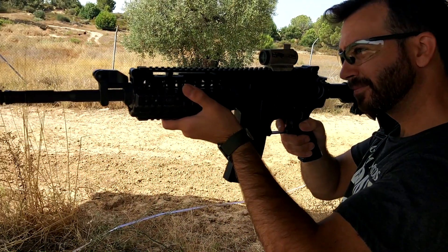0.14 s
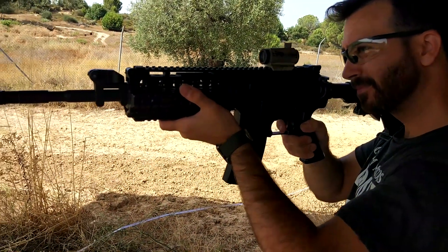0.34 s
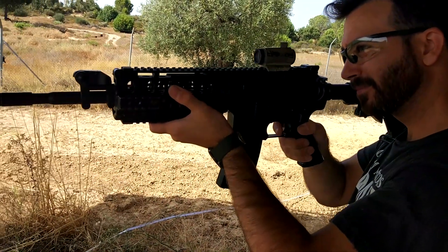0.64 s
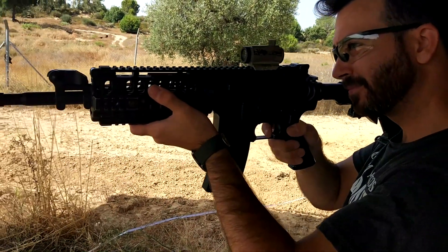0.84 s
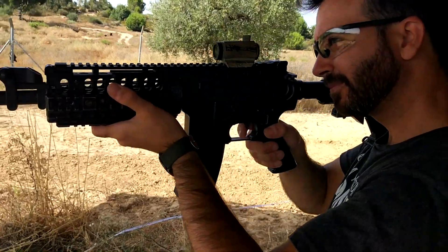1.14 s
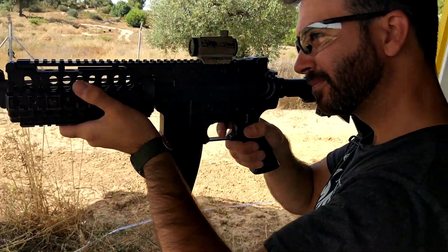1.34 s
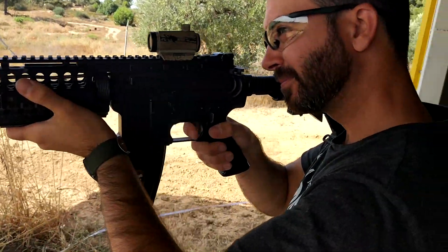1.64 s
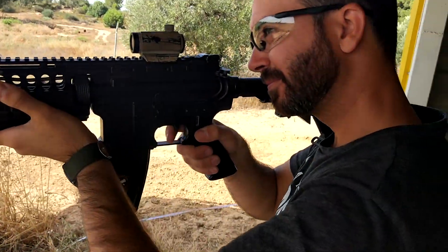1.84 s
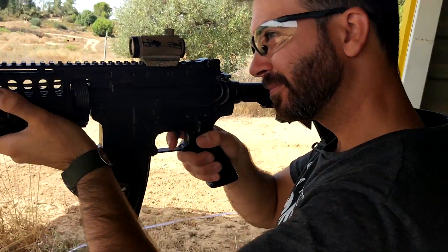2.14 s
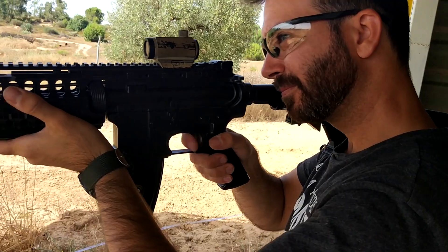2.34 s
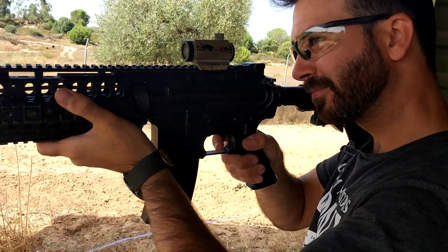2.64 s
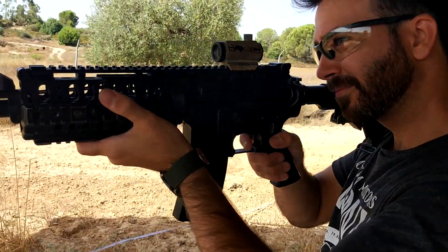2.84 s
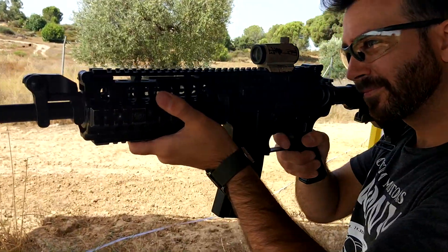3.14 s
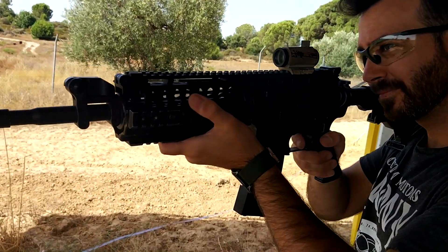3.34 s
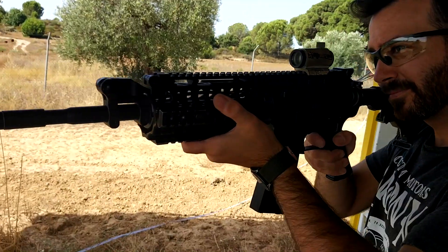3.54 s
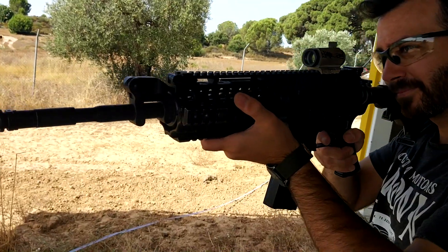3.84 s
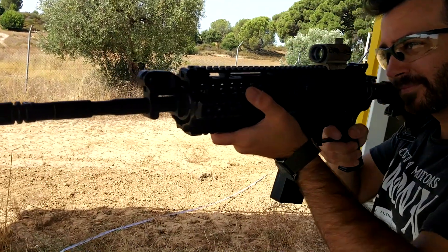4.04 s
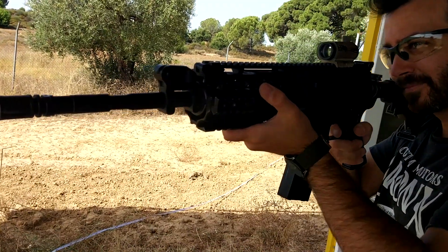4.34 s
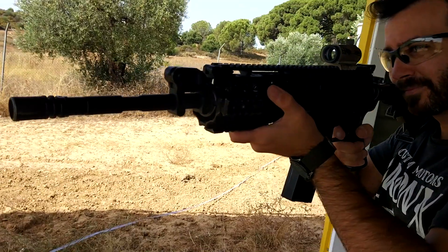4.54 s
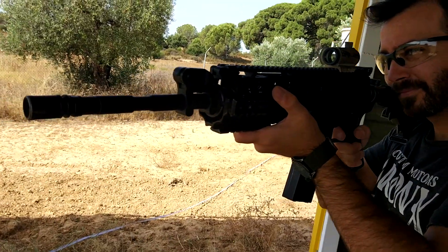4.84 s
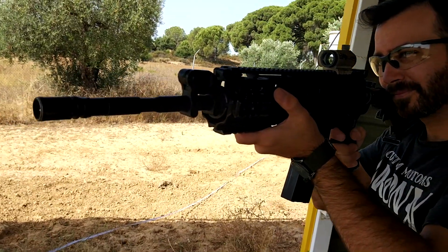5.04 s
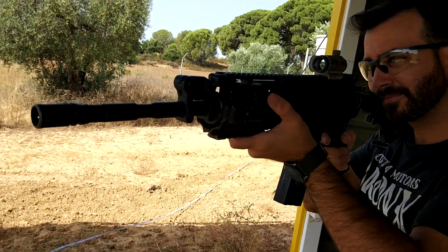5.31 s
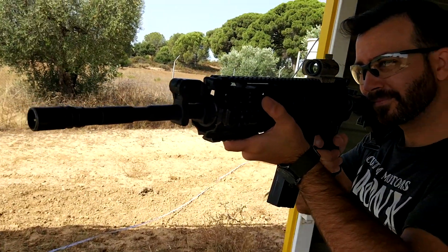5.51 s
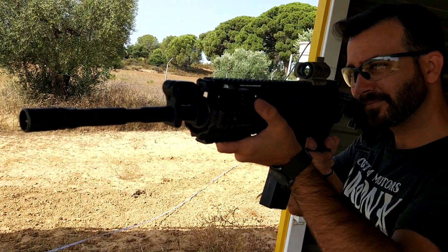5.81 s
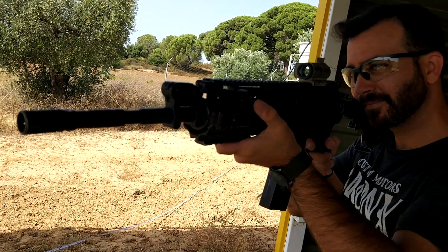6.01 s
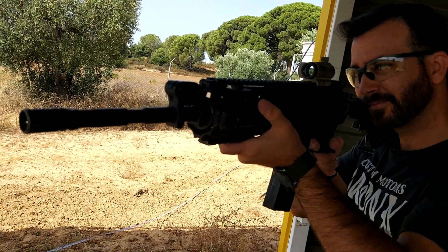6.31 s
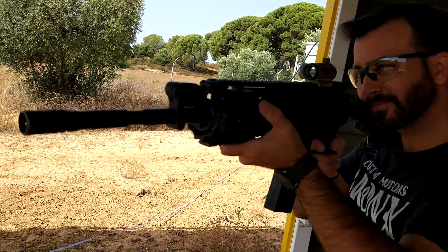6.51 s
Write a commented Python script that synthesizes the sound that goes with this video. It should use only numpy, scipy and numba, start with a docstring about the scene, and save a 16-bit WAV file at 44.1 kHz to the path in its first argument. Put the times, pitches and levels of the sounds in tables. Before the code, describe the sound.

Close, dry mechanical snaps from a motorised airsoft gun, each led by a brief whirr, with small clicks and handling bumps under an open shelter.

```python
"""An electric airsoft rifle fires single shots from a shelter at a dry outdoor range, close to a phone.
One shot has just gone off, and its echo is dying away at the start; ten more follow. For each, a motor drives
gears that whine and rasp against a spring, then a piston slams home in a burst of noise with a bright crack,
and the shelter rings on. Between the slams steel parts click, fingers bump, tick and once knock on the phone.
The phone turns towards the muzzle and the grip's rumble dies down; a faint open-air hush runs throughout."""
import sys
import numpy as np
from scipy import signal
from scipy.fft import rfft, irfft, next_fast_len
from scipy.io import wavfile
from numba import njit

SR = 44100
rng = np.random.default_rng(int(sys.argv[2]) if len(sys.argv) > 2 else 0)


def transcribe(u):
    """Save the signal u as a 16-bit wav file named by the first command-line argument.

    u: samples, shape (n,) or (channels, n), limited to [-1, 1]; the rate is SR.
    q: integer samples, one column per channel.
    """
    v = np.clip(np.atleast_2d(u).T, -1, 1)
    q = np.round(v * 32767).astype(np.int16)
    wavfile.write(sys.argv[1], SR, q)


N = 294147
TIME = np.arange(N) / SR
SIZE = next_fast_len(N + SR)  # room for a sound's tail when filtering
FREQ = np.maximum(np.arange(SIZE // 2 + 1) * SR / SIZE, 1)

# The shots; the first falls before the start. Each row: motor start in seconds, slam in seconds,
# whine level in dB, gear rasp level in dB, slam level in dB, time the gears take to bite in seconds.
SHOTS = [(-.2, -0.078, 3, 0, 1.5, 0.018), (0.237, 0.355, -6.5, 1.5, 0, 0.018),
         (.947, 1.071, 3.5, -4.5, 2, 0.021), (1.644, 1.774, 5.5, -1, 1, 0.025),
         (2.35, 2.48, 4.5, 0, 0.5, 0.023), (3.053, 3.174, 2, -0.5, 2.5, 0.013),
         (3.507, 3.637, 3.5, -2.5, 1.5, 0.027), (3.961, 4.083, -15, 2, -0.5, 0.028),
         (4.953, 5.075, 2, -3, 1, .027), (5.682, 5.811, 1, -3, 0, 0.025), (6.438, 6.566, 2.5, -1, -2, .026)]
# Resonances of the gearbox and receiver. Each row: frequency in Hz, width in Hz,
# lift at the left microphone in dB, lift at the right in dB.
BODY_MODES = [(371, 54, 8.5, 1), (486.5, 19, 6, 9.5), (632, 55, 10.5, 7.5), (886, 180, 10.5, 10.5),
              (973, 21, 7.5, -5), (1353, 233, 12.5, 5), (1803, 163, 1, 11), (1968, 130, -5.5, 1),
              (2380, 350, -4.5, 8), (2770, 150, 7, 6), (3010, 170, -1, 9.5), (3518, 68, 1, 13),
              (3720, 150, 8.5, -0.5), (3930, 51, 1.5, -1), (4170, 90, 7, 0), (4610, 40, 0.5, -9),
              (4725, 41, 0.5, 10.5), (5240, 29, 11.5, 5.5), (5700, 49, -3, 10), (5900, 80, 7.5, 2.5),
              (6250, 72, 12, -3), (6500, 50, 13, -3.5), (7300, 77, 3, 4.5)]
# Trigger and latch clicks. Each row: time in seconds, relative level in dB.
CLICKS = [(3.965, -10.5), (4.705, 0.5), (4.959, -14.5), (5.673, 3), (6.44, -17)]
# The clearest tiny dry ticks. Each row: time in seconds, relative level in dB.
TICKS = [(1.3368, -26), (1.3722, -22), (1.4007, -15.5), (1.9947, -19), (2.1822, -18), (4.415, -15.5),
         (4.4854, -25), (4.8553, -25.5), (6.246, -24.5)]
# Restlessness of the grip, which settles as the phone comes to rest. Each row: time in seconds, rumble in dB.
GRIP = [(0, -45.5), (1.4, -45.5), (2.9, -51.5), (4.3, -54), (5.5, -61), (6.2, -73.5)]
# The phone moves from beside the rifle towards its front.
# Each row: time in seconds, position from 0 (side-on) to 1 (near the muzzle).
FACING = [(1, 0.026), (2.4, 0.16), (3.6, 0.78), (6.5, 1)]


def undb(db):
    """Turn decibels into a gain."""
    return 10 ** (np.asarray(db) / 20)


def unit(x):
    """Scale to an rms of 1."""
    return x / np.sqrt(np.mean(np.abs(x) ** 2))


def pan(db):
    """Left and right gains for a level difference, left minus right, in dB."""
    gains = undb(np.array([[1], [-1]]) * db / 2)
    return gains / np.sqrt(np.mean(gains ** 2, axis=0))


def slope(points):
    """Join (Hz, dB) points by straight lines on a log-frequency axis."""
    hz, db = np.transpose(points)
    return np.interp(np.log(FREQ), np.log(hz), db)


def response(points, modes=()):
    """A broad slope plus resonances, in each microphone's own measure, as a filter that never rings early."""
    db = slope(points)
    for hz, width, left_db, right_db in modes:
        peak = 1 / (1 + (2 * (FREQ - hz) / width) ** 2)
        db = db + np.array([[left_db], [right_db]]) * peak
    # folding the cepstrum forward in time gives the phase of a sound that starts at once
    cepstrum = irfft(np.log(undb(db)), SIZE)
    cepstrum[..., 1:SIZE // 2] *= 2
    cepstrum[..., SIZE // 2 + 1:] = 0
    return unit(np.exp(rfft(cepstrum)))


def through(x, gain):
    """Pass a sound through a frequency response."""
    return irfft(rfft(x, SIZE) * gain, SIZE)[..., :N]


def air(split_hz):
    """Noise at two microphones: much alike below split_hz, unrelated well above."""
    likeness = .88 / (1 + (FREQ / split_hz) ** 4)
    shares = np.sqrt([(1 + likeness) / 2, (1 - likeness) / 2])
    mid, side = through(rng.standard_normal((2, N)), shares)
    return np.array([mid + side, mid - side])


def walk(rate):
    """Random drift with a spread near 1, heading for a new value `rate` times a second."""
    steps = rng.standard_normal(N // 20)
    return np.interp(TIME * rate, np.arange(len(steps)), steps)


def along(curve, s):
    """Value of a control curve at time s."""
    return np.interp(s, *np.transpose(curve))


def add(track, s, sound):
    """Mix a sound into a track from time s on."""
    start = int(round(s * SR))
    first, last = max(start, 0), min(start + sound.shape[-1], track.shape[-1])
    if last > first:
        track[..., first:last] += sound[..., first - start:last - start]


def shake(t):
    """Quick random unevenness of gear teeth, new every few milliseconds."""
    knots = t[::100]
    return np.interp(t, knots, rng.standard_normal(len(knots)))


def shifting(x):
    """As the gears turn, their force wanders between three families of gearbox frequencies."""
    out = 0
    for k in range(3):
        family = (1 + np.cos(2 * np.pi * (FREQ / 950 + k / 3))) / 3
        out = out + through(x, family) * undb(3.5 * walk(45) - 1)
    return out


def gears(spin_up_s=.032, load=.1, whine_db=-22, rasp_db=-18.0, squeal_db=-26):
    """The motor runs up and sags as the spring tightens; meshing teeth whine and rasp through the gearbox."""
    # Tones of the gear mesh. Each row: multiple of the mesh rate, level in dB.
    mesh_tones = [(1, -1.5), (1.44, -10), (2, -8.5)]
    # Broad colour of the rasp. Each row: frequency in Hz, level in dB.
    rasp_colour = [(100, -39.5), (350, -16.5), (560, -14), (720, -8), (1000, -3), (2000, 2), (3100, -5),
                   (4500, 6.5), (6500, 0.5), (8000, -5.5), (9500, -9), (15500, -15.5)]
    # Balance of the gears. Each row: frequency in Hz, left minus right in dB.
    gear_balance = [(200, -4.5), (700, -2.5), (1300, -8.5), (2300, -4), (4400, -2.5), (9000, -1)]
    stroke_teeth = 162  # sets the mesh rate before run-up and sag: a quicker shot whines higher
    squeal_front_db = -16  # the pinion is weaker from the front
    t = np.arange(SR // 4) / SR
    whine, growl, scrape = np.zeros((2, N)), np.zeros(N), np.zeros(N)
    for start, slam_s, tone_db, teeth_db, _, bite_s in SHOTS:
        run = slam_s - start
        mesh_hz = stroke_teeth / run
        pinion_db = squeal_db + squeal_front_db * along(FACING, start) ** 2
        run_up = 1 - np.exp(-(t + .004) / spin_up_s)
        speed = run_up * (1.1 - load * np.minimum(t / run, 1) ** 2)
        # the teeth take up the load, and lose it as the piston slips free just before the slam
        bite = np.minimum(t / .01, 1) / (1 + np.exp(-(t - bite_s) / .007))
        force = bite * np.exp(-np.maximum(t - run + .018, 0) / .025)
        stumble = .03 * np.interp(t / 6, t, shake(t))  # slower unevenness
        uneven = 1 + .03 * shake(t) + stumble
        phase = 2 * np.pi * np.cumsum(mesh_hz * speed * uneven) / SR
        # the mesh tone gets extra drive while the motor accelerates
        torque = force * (1 + 2.6 * np.exp(-t / 0.02))
        for multiple, db in mesh_tones:
            lag = rng.uniform(0, 2 * np.pi) + rng.normal(0, 0.51, (2, 1)) * multiple
            chatter = undb(2.5 * shake(t) + 3 * np.interp(t / 7, t, shake(t)) - .5)
            tone = torque * chatter * np.sin(multiple * phase + lag)
            add(whine, start, undb(whine_db + tone_db + db) * tone)
        # the loose pinion squeals in a rough cluster of tones
        for multiple in (2.85, 3.7, 3.85, 4.05, 4.6):
            slip = np.array([shake(t), shake(t)]) + rng.uniform(0, 2 * np.pi, (2, 1))
            squeal = force * speed ** 2 * np.sin(multiple * phase + slip)
            add(whine, start, undb(pinion_db) * squeal)
        # teeth grind once a mesh, with uneven force
        grit = undb(1.5 * shake(t)) * (1 + .7 * np.cos(phase))
        # slow teeth mostly growl; the bright scrape comes with speed
        add(growl, start, undb(rasp_db + 0.36 * teeth_db) * force ** 0.53 * grit)
        add(scrape, start, undb(rasp_db + teeth_db) * force * speed ** 0.64 * grit)
    whine = through(whine, response([(400, -8), (800, 9.5), (6000, 20)], BODY_MODES))
    noise = shifting(air(1200))
    bright = 1 / (1 + (2800 / FREQ) ** 4)
    grinding = through(growl * noise, 1 - bright) + through(scrape * noise, bright)
    rasp = through(grinding, response(rasp_colour, BODY_MODES))
    return through(whine + rasp, pan(slope(gear_balance)))


def piston(slam_db=3, crack_db=0, crack_s=0.0027):
    """A quick cluster of blows shakes the receiver; the landing adds a bright crack."""
    # Blows of one stroke: gear lets go, piston slides, air leaves, piston lands, spring rebounds.
    # Each row: delay from the slam in seconds, level in dB, decay in seconds.
    stroke_blows = [(-.011, -22.5, 0.0033), (-.0065, -15.5, 0.0035), (-.0022, -1.5, 0.0011),
                    (.0005, -3, .003), (.005, -12, 0.008)]
    # Broad colour of the slam. Each row: frequency in Hz, level in dB.
    slam_colour = [(50, -37), (100, -24.5), (190, 3), (350, 6.5), (520, -1), (900, 4), (1500, -2),
                   (2800, -0.5), (5000, -5.5), (8000, -10), (15500, -15)]
    crack_side_db = -24.5  # the crack is weaker from the side
    t = np.arange(SR // 10) / SR
    blows, cracks = np.zeros(N), np.zeros(N)
    for _, slam_s, _, _, db, _ in SHOTS:
        bright_db = crack_side_db * (1 - along(FACING, slam_s))
        for delay, blow_db, decay in stroke_blows:
            add(blows, slam_s + delay, undb(db + blow_db) * np.exp(-t / decay))
        add(cracks, slam_s, undb(bright_db) * np.exp(-t / crack_s))
    thud = through(blows * air(1400), response(slam_colour, BODY_MODES))
    crack_colour = [(100, -37.0), (500, -21), (3000, 16.0), (7000, 18), (15000, -7.0)]
    crack = through(cracks * air(1400), response(crack_colour))
    return undb(slam_db) * thud * pan(-0.69) + undb(crack_db) * crack


def trigger(click_db=-19, ring_db=-39, ring_s=0.043):
    """Small steel parts snap hard, then buzz on more faintly in their resonances."""
    # Steel parts of the trigger group. Each row: frequency in Hz, width in Hz, left lift in dB, right lift in dB.
    latch_modes = [(935, 87, 11.5, 12.5), (2104, 150, 1.5, 20), (3540, 220, 20.5, 16.5),
                   (4290, 290, 13, 18.5), (7850, 600, 12, 9)]
    t = np.arange(SR // 3) / SR
    strike, buzz = np.zeros(N), np.zeros(N)
    contact = np.exp(-t / .0025)
    for s, db in CLICKS:
        add(strike, s, undb(db + click_db) * contact)
        add(buzz, s, undb(db + ring_db) * np.exp(-t / ring_s))
    snap_colour = [(50, -39.5), (200, -20.0), (900, -4.5), (4000, -6), (9000, -3), (15000, -3.0)]
    ring_colour = [(50, -35), (300, -11), (900, -8.5), (4500, -4), (8000, 4), (15000, -4)]
    snap = through(strike * air(1200), response(snap_colour, latch_modes))
    ring = through(buzz * air(1200), response(ring_colour, latch_modes))
    return pan(3) * (snap + ring)


def shelter(echo_db=-19, build_s=0.055, low_t60=0.42, high_t60=.42, gear_share=0.21, click_db=-24):
    """Roof, walls and ground scatter each shot into a dense noisy tail that swells, then dies away."""
    # Broad colour of the echo. Each row: frequency in Hz, level in dB.
    echo_colour = [(80, -40.5), (200, -1), (450, 1.5), (680, -2), (900, 2), (1200, 4), (1600, 1.5),
                   (2100, 2.5), (3300, 0.5), (5000, 1), (6800, -2), (8500, -7.5), (15500, -13)]
    # Resonances that linger under the roof. Each row: frequency in Hz, width in Hz, left lift in dB, right in dB.
    hollow_modes = [(848.5, 120, 9, 10), (990, 53, 5, -0.5), (1950, 390, 1, 5), (3070, 120, -9, 2),
                    (4200, 120, 4, 1.5)]
    # Balance of the echo. Each row: frequency in Hz, left minus right in dB.
    echo_balance = [(200, 2), (900, -2.5), (1400, -3.5), (2400, -7.5), (4400, -4), (9000, 0.5)]
    noise, out = through(air(1300), response(echo_colour, hollow_modes)), 0
    treble = 1 / (1 + (3000 / FREQ) ** 2)
    t = np.arange(SR) / SR
    for share, t60 in ((1 - treble, low_t60), (treble, high_t60)):
        # this is power, so it falls by 60 dB in t60 seconds
        tail = (1 - np.exp(-t / build_s)) * undb(-120 * t / t60)
        tail = tail / tail.max()
        power = np.zeros(N)
        for start, slam_s, _, rasp_db, db, _ in SHOTS:
            add(power, slam_s, undb(db) ** 2 * tail)
            add(power, (start + slam_s) / 2, gear_share * undb(rasp_db) ** 2 * tail)
        for s, db in CLICKS:
            add(power, s, undb(db + click_db) ** 2 * tail)
        out = out + through(noise, share) * np.sqrt(power)
    # the far bank and trees return a faint later wash, strongest in the upper middle
    far = np.zeros(N)
    for _, slam_s, *_ in SHOTS:
        add(far, slam_s + 0.11, np.minimum(t / 0.091, 1) * np.exp(-t / 0.13))
    far_colour = [(200, -24.5), (850, -5.5), (1400, -12.5), (2200, 11.5), (3200, -6.5), (8000, -29.0)]
    out = out + undb(-26.5) * far * through(air(900), response(far_colour))
    return undb(echo_db) * through(out * undb(1.0 * walk(150)), pan(slope(echo_balance)))


def nudges(count=34):
    """Light random finger bumps, firmer while the grip is restless: rows of seconds, dB, Hz."""
    over_rumble_db, spread_db, centre_hz = 14, 4.5, 222.3
    when, force, pitch = rng.uniform(-1, 1, (count, 3)).T
    s = (np.arange(count) + (1 + when) / 2) / count * N / SR
    db = along(GRIP, s) + over_rumble_db + spread_db * force
    return list(zip(s, db, centre_hz * (1 + .15 * pitch)))


def bumps(bump_db=0, swell_s=0.0031, lead_s=.002, scuff_db=-13):
    """Fingers push on the phone's case, which answers with a dull thud and a short scuff of skin."""
    # The firmest bumps. Each row: time in seconds, level in dB, settled pitch in Hz.
    firm_bumps = [(.003, -17.5, 253), (.096, -22, 270), (0.125, -12, 229), (.503, -20.5, 197),
                  (.525, -17, 204), (.582, -15.5, 226), (0.825, -20, 268), (.868, -16.5, 245),
                  (1.342, -17.5, 244), (1.362, -19, 184), (1.442, -20, 215), (1.466, -19.5, 290),
                  (1.614, -23.5, 221), (2.076, -21, 198), (2.159, -24, 222), (2.251, -16.5, 244),
                  (2.437, -19, 217.5), (2.99, -31, 219), (3.874, -14, 239), (4.204, -24.5, 163),
                  (4.42, -18.5, 221), (4.816, -31.5, 253), (5.379, -24, 180), (5.593, -27.5, 219)]
    bump_pan_db = -23.5  # left minus right: mostly the right microphone
    knock_s, knock_db = 3.923, 6.5  # one harder fingertip knock
    t = np.arange(SR // 10) / SR
    thuds, contact = np.zeros((2, N)), np.zeros((2, N))
    for s, db, hz in firm_bumps + nudges():
        push = (t / swell_s) ** 2 * np.exp(2 - 2 * t / swell_s)
        ring = 0.52 * np.exp(-t / 0.013) * (1 - np.exp(-t / swell_s))
        cycles = hz * (t + .0012 * (1 - np.exp(-t / 0.0013)))  # the first contact is stiffer, so higher
        thud = (push + ring) * np.sin(2 * np.pi * cycles)
        add(thuds, s + lead_s, undb(db + bump_db) * pan(bump_pan_db) * thud)
        rub = np.exp(-np.abs(t - .014) / 0.013)
        add(contact, s - .008, undb(db + scuff_db) * pan(bump_pan_db) * rub)
    scuff_colour = [(60, -31.0), (180, 10.5), (350, 1), (600, -8), (900, -25.5), (2500, -51)]
    scuffs = through(contact * air(400), response(scuff_colour))
    force = np.zeros(N)
    add(force, knock_s, np.ones(1))
    knock_colour = [(80, -25), (250, 9), (580, 11.5), (850, -1), (1150, 9),
                    (1800, -16), (2800, -11), (4500, -31.0), (12000, -57)]
    knock = through(force, response(knock_colour))
    case = 1 / (1 - 1j * 90 / FREQ) ** 2  # the stiff case passes little deep bass
    return through(thuds, case) + scuffs + undb(knock_db) * pan(19) * knock


def slips():
    """Skin slips in small steps, so a weaker tick comes near each clear one: rows of seconds, dB."""
    reach_s, weaker_db = .05, -11.5
    return [(s + reach_s * rng.uniform(-1, 1), db + weaker_db) for s, db in TICKS]


def fingers(tick_db=2, tick_s=0.00026):
    """The grip on the phone: a low uneven rumble of noise and tiny dry ticks."""
    tick_pan_db = 29  # left minus right: mostly the left microphone
    t = np.arange(SR // 10) / SR
    ticks = np.zeros((2, N))
    for s, db in TICKS + slips():
        fade = np.exp(-t / tick_s) + 0.017 * np.exp(-t / .004)
        grain = rng.standard_normal(len(t)) * fade
        add(ticks, s + 0.0006, undb(db + tick_db) * pan(tick_pan_db) * grain)
    rumble_colour = [(40, -48.5), (100, -20.0), (190, -0.5), (270, -2.0), (450, -26.5), (900, -38), (3000, -62.5)]
    rumble = through(air(400), response(rumble_colour))
    rumble = rumble * undb(along(GRIP, TIME) + 7.0 * walk(25)) * pan(-7.5)
    return rumble + through(ticks, response([(500, -1), (3000, -13.0), (7000, -2.5), (13000, 4.0)]))


def field():
    """Faint open-air hush: coloured noise whose level drifts slightly."""
    # Colour of the hush. Each row: frequency in Hz, level in dB.
    hush_colour = [(15, -58), (25, -41), (108, -3.5), (754, -6.5), (1020, -11), (1290, -12.5),
                   (1520, -11.5), (5280, -14.5), (5730, -17.5), (11600, -13.5), (16000, -22.5)]
    hush_db = -58
    return undb(hush_db + .7 * walk(1.7)) * through(air(500), response(hush_colour))


def scene():
    """Rifle, shelter, hand and field together."""
    return gears() + piston() + shelter() + trigger() + bumps() + fingers() + field()


@njit
def follow(x, attack, release):
    """Track loudness with an envelope that rises fast and falls slowly."""
    out, level = np.empty(len(x)), 0.
    for i in range(len(x)):
        level += (x[i] - level) * (attack if x[i] > level else release)
        out[i] = level
    return out


def record(dry, limit_db=-5, attack_s=0.00074, release_s=0.084):
    """The phone's limiter turns loud sound down, recovers slowly and rounds peaks; deep bass and top are cut."""
    top_hz = 15700
    envelope = follow(np.abs(dry).max(axis=0), 1 / (1 + attack_s * SR), 1 / (1 + release_s * SR))
    limited = np.tanh(dry / np.maximum(envelope / undb(limit_db), 1))
    bass_cut = signal.butter(2, 75, "highpass", fs=SR, output="sos")
    top_cut = signal.ellip(8, .2, 70, top_hz, fs=SR, output="sos")
    return signal.sosfilt(top_cut, signal.sosfilt(bass_cut, limited))


dry = scene()
out = record(dry)
transcribe(out)
```